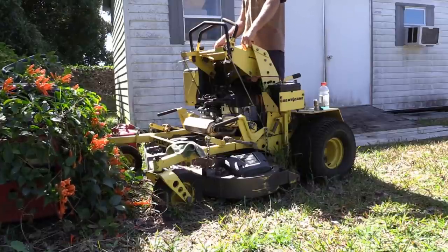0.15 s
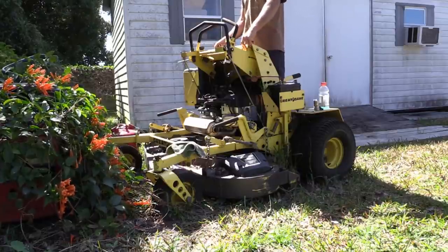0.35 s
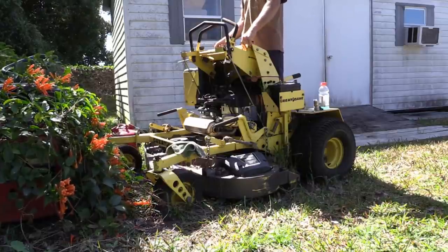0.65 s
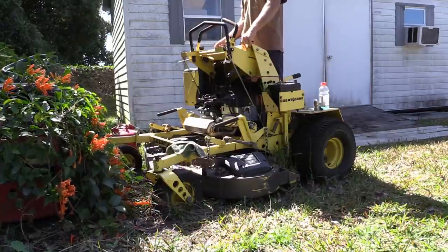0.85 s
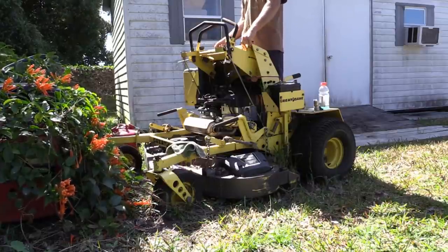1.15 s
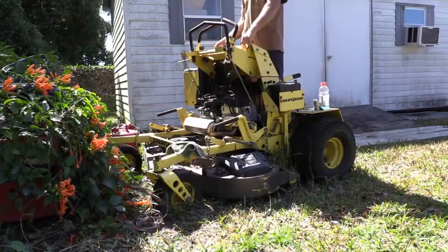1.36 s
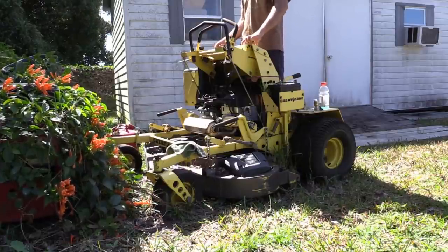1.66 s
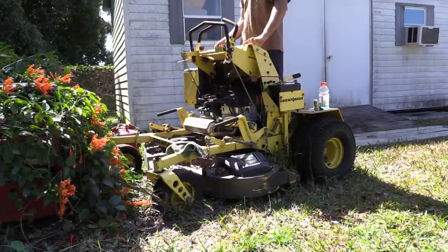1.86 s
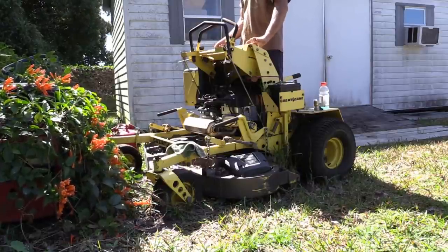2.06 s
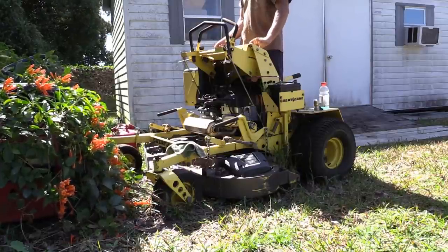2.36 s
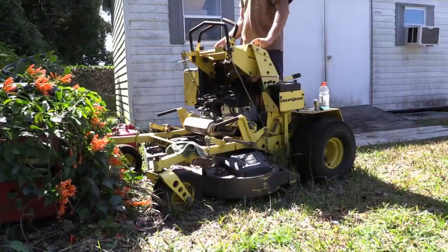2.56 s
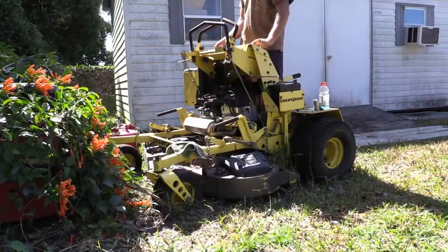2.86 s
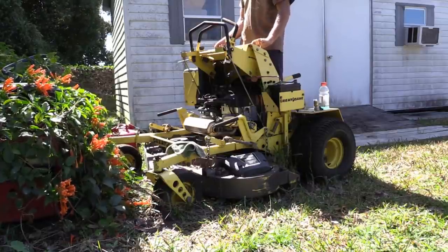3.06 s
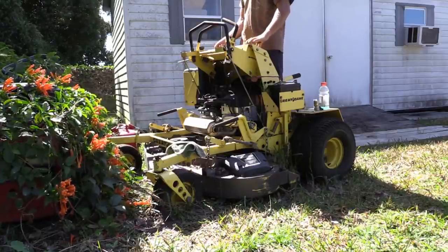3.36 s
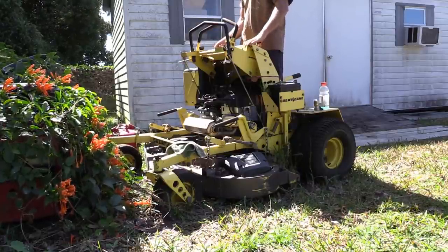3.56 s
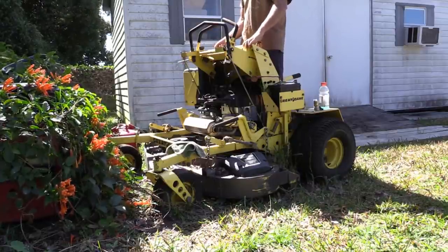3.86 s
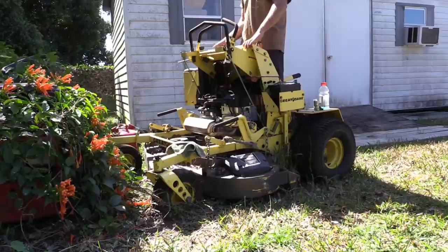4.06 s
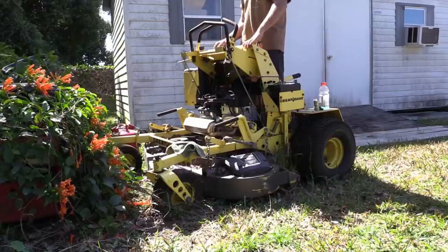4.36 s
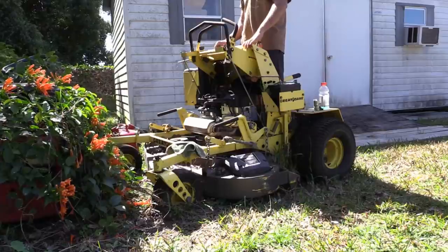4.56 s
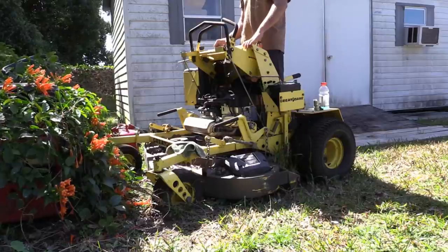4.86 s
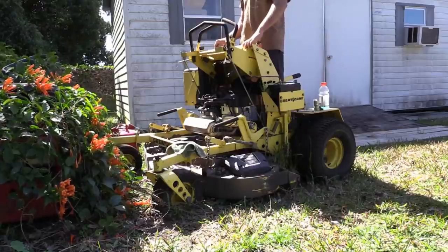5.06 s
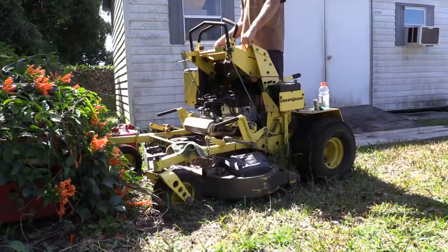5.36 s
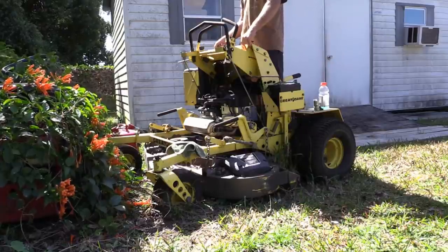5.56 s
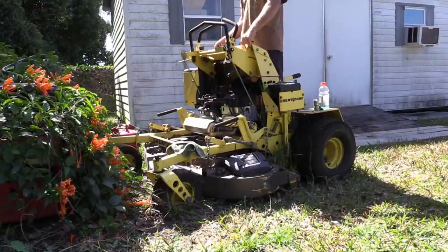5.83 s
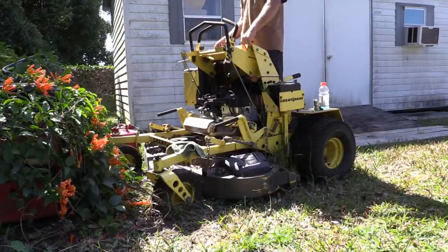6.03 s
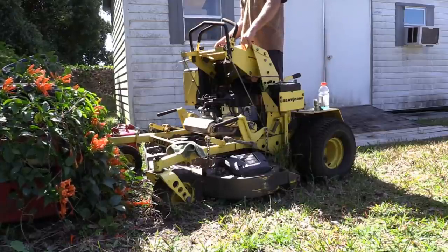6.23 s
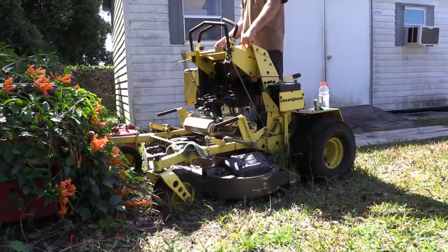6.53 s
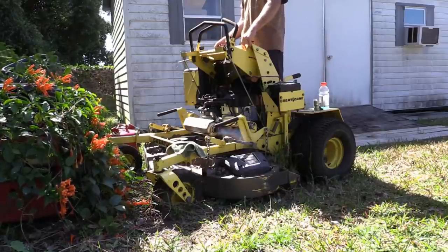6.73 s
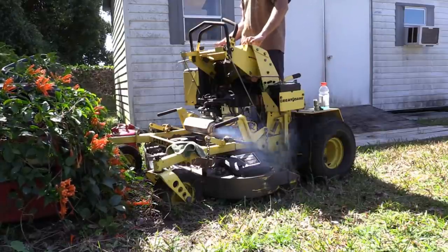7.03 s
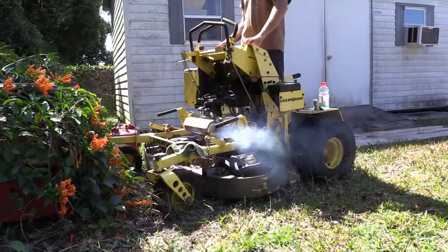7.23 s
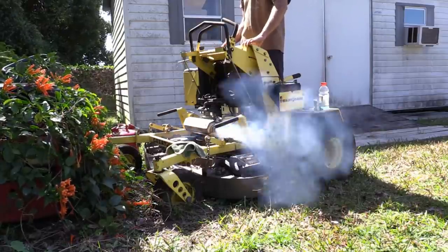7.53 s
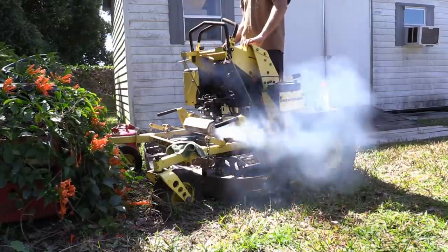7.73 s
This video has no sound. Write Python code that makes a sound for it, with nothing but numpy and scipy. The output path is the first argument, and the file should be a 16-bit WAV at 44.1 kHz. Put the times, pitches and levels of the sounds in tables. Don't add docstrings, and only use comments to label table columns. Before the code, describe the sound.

Quiet outdoor air beside a house wall, mower fairly close. At 0.1 s a solenoid clunk and pinion crunch start the electric starter; its gear whine rushes upward from a low groan within about a second, then holds near 1.3 kHz, gritty and bright, pulsing with every compression, over soft lumpy exhaust puffs. At 3.8 s the starter drops out; the engine freewheels with a dull rumble, scattered valve clacks and cover taps slowing down, ending with a tiny belt squeak at about 4.55 s and faint thumps near 4.8 s. Almost still, then small key clicks at 5.05 and 5.1 s. At 5.3 s the pinion bites again and the whine climbs once more until 6.3 s. The engine fires unevenly, thumping, knocking and faltering, catches around 6.85 s, then accelerates into loud, rapid exhaust beats, sharp block knocks and metallic tappet clatter, still revving at the end, 7.9 s.

```python
import sys
import numpy as np
from scipy import signal
from scipy.fft import rfft, irfft, next_fast_len
from scipy.io import wavfile
from scipy.ndimage import uniform_filter1d

SR = 44100
rng = np.random.default_rng(int(sys.argv[2]) if len(sys.argv) > 2 else 0)


def how_loud(loudness_db):
    steps = np.asarray(loudness_db, float) / 20
    return 10 ** steps


def master_out(mix):
    frames = np.transpose(np.atleast_2d(mix))
    ceiling = np.clip(frames, -1, 1)
    pcm = np.round(ceiling * 32767).astype(np.int16)
    wavfile.write(sys.argv[1], SR, pcm)


N = 347949
TIME = np.arange(N) / SR
PADDED = next_fast_len(N + SR // 2, True)
BINS = np.fft.rfftfreq(PADDED, 1 / SR)

# (frequency [Hz], density [dB/Hz])
YARD_DB_PER_HZ = [(24, -43), (40, -13), (117, 0.5), (301, -7.5), (417, -5), (606, -4), (998, -1),
                  (1680, -4.5), (3840, -10), (9650, -22), (10700, -26), (11800, -28), (15500, -27)]
YARD_DB = -46
# (frequency [Hz], left minus right [dB])
LEFT_MINUS_RIGHT_DB = [(60, 0.5), (150, -1), (380, 0), (950, 3), (2380, 2.0), (5980, 2), (15000, 2)]
# (frequency [Hz], level [dB])
WALL_DB = [(30, -10), (100, -29.5), (300, -17.5), (1000, -13.5), (2000, -15.5), (4500, -7.5), (9000, -12),
           (13000, -11)]

# (time [s], rate [four-stroke cycles/s])
REVS_HZ = [
    (6.856, 6.44),
    (7.172, 8.05),
    (7.668, 12.33),
    (8.1, 12.8),
]
# (multiple of cycle rate, level [dB])
DRONE_ORDERS = [(10, -27), (14, -30), (16, -27)]
# (place [0-1], level [dB], pitch [Hz])
PULSES = [
    (0, -1, 165),
    (.19, 1, 180),
    (.5, 0, 170),
    (.69, -8, 170),
    (.81, -10, 170),
]
# (time [s], peak [dB], pitch [Hz])
THUMPS = [(4.775, -40, 137), (4.784, -33, 196), (4.809, -37, 151), (4.829, -42, 205), (6.326, -27, 103),
          (6.339, -24, 285), (6.384, -20, 188), (6.459, -24, 285), (6.593, -24, 156), (6.608, -16, 291),
          (6.634, -22, 116), (6.653, -18, 194), (6.709, -22, 296), (6.792, -24, 293), (6.816, -12, 275),
          (6.832, -11, 290), (6.866, -13, 207), (6.886, -19, 280), (6.912, -16, 221), (6.941, -9, 318),
          (6.956, -17, 248)]
# (time [s], level [dB])
PUFFING_DB = [
    [(0.1, -41), (0.21, -45.5), (1.3, -38), (2.6, -35.5), (3.69, -28), (3.96, -39.5), (4.33, -34.5),
     (4.5, -58), (4.9, -53)],
    [(5.3, -52), (5.48, -61), (6.29, -41), (6.33, -35.5), (6.75, -38), (6.85, -27), (7.3, -23), (7.89, -42)],
]
# (frequency [Hz], density [dB/Hz])
PIPE_DB_PER_HZ = [(18, -50), (30, -23), (65, -4.5), (172, 5), (223, -7), (257, -0.5), (316, -19),
                  (350, -8.5), (460, 3.5), (770, -120)]
# (time [s], pitch [Hz], partial 1 [dB], partial 3 [dB], partial 4 [dB])
SQUEAK = [
    (4.535, 423, -43, -64, -62),
    (4.55, 463, -40, -35, -44),
    (4.565, 486, -32.5, -34, -39),
    (4.61, 495, -39.5, -61, -58),
    (4.645, 504, -51, -80, -79),
]

# (frequency [Hz], density [dB/Hz])
BLOCK_DB_PER_HZ = [(120, -29), (200, -15), (244, -3.5), (462, -8), (690, -7), (906, -4.5), (1030, -5.5),
                   (1170, -1), (1910, -5), (3300, -6), (7900, -16.5), (12000, -26.5), (15500, -39)]
# (frequency [Hz], width [Hz], level [dB])
BLOCK_MODES = [(436, 87, -4), (570, 76, 0), (769, 38, 4.5), (890, 99, 0.5), (1210, 59, -41),
               (2660, 180, -1), (3400, 160, -7), (4780, 100, -5)]
# (time [s], level [dB])
EFFORT_DB = [
    (6.28, -19),
    (6.36, -15),
    (6.49, -19),
    (6.68, -15.5),
    (7.03, -13.5),
    (7.5, -13),
    (7.89, -12),
]
# (time [s], change [dB], half width [s])
CHUFFS = [(6.36, 0.5, .03), (6.41, 1, 0.017), (6.56, 1.5, 0.018), (6.645, 0.5, 0.031), (6.78, -4, .015),
          (6.88, 2.5, .03), (6.935, 2, 0.0068), (6.975, 2, 0.012), (7.025, 3.5, 0.015), (7.06, 2.5, 0.044),
          (7.155, 4, 0.036), (7.235, 3, 0.025), (7.27, 3.5, 0.016), (7.355, 4, 0.041), (7.45, 2, 0.015),
          (7.49, 1.5, 0.0081), (7.54, -1.5, 0.013), (7.575, 2.5, 0.013), (7.625, 0.5, 0.012),
          (7.70, 0.5, 0.022), (7.79, 2, 0.014), (7.865, -1, 0.017)]
# (time [s], peak [dB])
CLACKS_COASTING = [(3.8783, -16), (3.908, -26), (3.977, -30), (4.006, -31), (4.018, -22.5), (4.073, -28),
                   (4.101, -29), (4.116, -23), (4.134, -30), (4.1799, -33), (4.2135, -35), (4.2634, -41),
                   (4.28, -43), (4.315, -37), (4.346, -29), (4.3984, -48), (4.4445, -39), (4.4836, -39),
                   (4.58, -36.5), (4.9791, -42)]
# (time [s], peak [dB], ring [Hz])
CLACKS_RUNNING = [(6.3523, -11.5, 2840), (6.374, -11.5, 2710), (6.4144, -15, 2470), (6.461, -21, 3190),
                  (6.5299, -30, 2060), (6.553, -19, 2430), (6.601, -14.5, 2640), (6.6283, -16, 2890),
                  (6.638, -14, 2900), (6.649, -15, 2870), (6.674, -15.5, 3330), (6.7124, -24, 2610),
                  (6.79, -16, 2830), (6.859, -10, 2700), (6.917, -8.5, 3020), (6.944, -8.5, 4900),
                  (6.995, -8, 3180), (7.132, -15, 2820), (7.1547, -13, 3400), (7.253, -11, 3270),
                  (7.3626, -11, 2290), (7.4145, -11, 3400), (7.4636, -9, 3220), (7.5067, -11, 3180),
                  (7.554, -16, 2710), (7.6383, -9, 3530), (7.655, -12, 3740), (7.76, -11, 7250),
                  (7.798, -13, 2660), (7.837, -16, 3320)]
# (time [s], peak [dB], ring [Hz])
COVER_TAPS = [(3.879, -24, 1230), (3.899, -14, 1115), (3.977, -15, 1230), (3.999, -14, 764),
              (4.009, -23, 1200), (4.067, -32, 890), (4.109, -23, 900), (4.155, -24, 725),
              (4.177, -24, 1160), (4.265, -20, 1210), (4.289, -27, 790), (4.317, -20, 1230),
              (4.379, -39, 910), (4.407, -38, 810), (4.448, -28, 1150), (4.482, -34, 1160)]
# (time [s], peak [dB], ring [Hz], T60 [s])
CHINKS = [
    (4.02, -27, 3600, .05),
    (4.1152, -28, 3910, .06),
    (4.18, -33, 2100, .04),
    (4.3472, -30, 3620, .05),
    (4.444, -37, 2290, .04),
]
# (time [s], peak [dB])
TAPPET_TICKS = [(6.3185, -7), (6.3515, -15), (6.3749, -10), (6.4143, -13), (6.462, -8.5), (6.5121, -24),
                (6.5294, -23), (6.553, -20), (6.5939, -14), (6.6014, -18), (6.6244, -14), (6.6408, -18),
                (6.6717, -16), (6.7124, -21), (6.788, -8), (6.8573, -4), (6.9164, -13), (6.9464, -11),
                (6.995, -2.5), (7.0768, -23), (7.132, -0.5), (7.1556, -13), (7.2035, -19), (7.2529, -4),
                (7.2754, -9), (7.3622, -5), (7.3814, -6), (7.4135, -12), (7.4624, -13), (7.4794, -3),
                (7.5078, -4), (7.5522, -6), (7.5694, -8), (7.5951, -5), (7.6524, -8), (7.7174, -7),
                (7.7348, -5), (7.7598, -6), (7.7997, -13), (7.815, -4), (7.8386, -5), (7.86, -17),
                (7.8794, -8)]
# (time [s], peak [dB], ring [Hz], T60 [s])
KEY_CLICKS = [
    (5.0464, -34.5, 1590, 0.13),
    (5.0485, -39, 810, 0.15),
    (5.1013, -40.5, 2920, 0.21),
]
# (time [s], peak [dB], ring [Hz])
KNOCKS = [(6.331, -8, 920), (6.401, -4.5, 777), (6.659, -12, 776), (6.723, -18, 880), (6.777, -6, 770),
          (6.843, -7, 890), (6.879, -3, 884), (6.938, -22, 950), (7.05, -7, 890), (7.104, 2, 903),
          (7.15, -7, 930), (7.187, -6, 910), (7.242, -6, 850)]
# (time [s], peak [dB])
BLOWS = [
    (7.353, -5),
    (7.445, -4),
    (7.538, -1.5),
    (7.624, -3.5),
    (7.705, -11),
    (7.786, -8),
    (7.865, -4),
]

# (spin-up clock start [s], speed share, place in engine cycle [0-1])
CRANKS = [
    (.17, 1, .08),
    (5.381, .993, .21),
]
# (time [s], grind above 2.2 kHz [dB], grind below [dB])
LET_GO = [
    (3.8, -17.5, -25),
    (6.292, -16, -27.5),
]
COMPRESSIONS = [0.97, 0.3425]
TEETH_PER_CYCLE, TEETH_ON_PINION = 230.5, 15
TOP_HZ, RUSH_HZ, RUSH_S, CREEP_HZ, CREEP_S = 1308.3, 723.8, .2519, 329.7, .67
HEAVE_HZ, HEAVE_HZ_PER_S, DRAG_HZ, DRAG_S = 245, 1500, 65, .09
COAST_S, COAST_DB, HISS_DB, HISS_DB_PER_S = 0.9, -21, -29, -31
# (frequency [Hz], width [Hz], level [dB])
HOUSING_MODES = [(425, 50, 4), (915, 110, 5.5), (1170, 60, 7), (2120, 40, -2), (2730, 60, 8),
                 (2830, 90, 11), (3870, 200, -3), (4870, 90, 5), (4600, 200, 0), (5190, 140, 6),
                 (6340, 90, 0), (6780, 200, 5), (7390, 120, 0), (8110, 120, 5), (8640, 180, 5),
                 (9740, 70, 3), (10500, 200, 2)]
# (time [s], peak [dB], length [s])
BITES = [
    (0.095, -20, 0.013),
    (0.11, -11.5, 0.028),
    (0.12, -14.5, 0.015),
    (5.298, -23, 0.013),
    (5.314, -17, 0.033),
    (5.323, -14.5, 0.012),
]
# (frequency [Hz], density [dB/Hz])
BITE_DB_PER_HZ = [(120, -50), (200, -12), (399, -5.5), (715, -1), (1070, -10), (1170, -1.5), (1780, 3.5),
                  (2850, -7), (3180, -3.5), (8350, -6), (15500, -31)]
# (frequency [Hz], density [dB/Hz])
GRIND_DB_PER_HZ = [(120, -50), (200, -14.5), (1050, -8.5), (1280, -5), (1810, -8.5), (2700, -3),
                   (3240, -7.5), (5200, -7), (5590, -7.5), (8350, -9), (10800, -17.5), (13900, -26),
                   (15500, -49)]
IDLE_GRIND_SHARE = .2
# (mesh rate [Hz], level [dB])
WHINE_DB = [(200, -40.5), (300, -25), (430, -19.5), (560, -24), (826, -20), (945, -6), (1085, -22.5),
            (1140, -15.5), (1175, -12.5), (1210, -15), (1245, -27), (1290, -27.5), (1310, -24.5)]
# (first crank [dB], second crank [dB])
OVERTONES_DB = [(-13, -14), (-17, -12), (-14, -9), (-22, -20), (-27, -26)]
# (time [s], change [dB], half width [s])
SLIPS = [(.17, -8, .015), (.224, -10, 0.0049), (5.405, -12, 0.0098), (5.438, -15, 0.0071),
         (5.46, -0.5, 0.0093), (5.512, -7, 0.0087), (5.552, -10, 0.02), (.3, -23, 0.0063),
         (.44, -6, 0.0059), (.565, -6, 0.037), (.36, -2, 0.026), (1.225, 6, 0.022), (.59, -18, 0.0059),
         (0.659, -11, 0.016), (0.851, -12, 0.015), (1.071, -17, 0.0067), (1.114, -18, 0.0071),
         (1.18, -19, 0.012), (1.26, 7, 0.012), (5.665, -18, 0.0091), (5.77, -11.5, 0.058),
         (5.85, -30, 0.0099), (5.914, -20, 0.016), (5.975, -9, 0.0093), (6.115, -18, 0.0065),
         (6.205, -14, 0.0069), (6.256, -21, 0.0078)]
# (time [s], share of speed, half width [s])
SURGES = [
    (.275, 0.044, 0.042),
    (5.49, .02, 0.029),
    (5.75, -0.036, 0.0256),
]
# (time [s], change [dB], half width [s])
FLARES = [
    [(.23, -8, 0.032), (.285, 3.5, 0.0097), (.39, -1, .02), (.43, 7, .015), (.52, 1, .04), (.65, 5, .03),
     (.88, 3, .08), (1.3, 2, .15), (6.15, 8, 0.087), (5.45, -6, .02), (5.52, 1.5, .025), (5.64, -2, .04),
     (5.97, 14, .02)],
    [(.275, 20, .03), (.335, 15, 0.028), (.5, 11, .05), (1.2, 4, .2), (5.97, 3, .04), (5.5, 15, .03),
     (5.565, 10, .03), (5.62, 7, .02), (5.71, 2, 0.028), (6.15, 12, 0.048)],
    [(.275, 14, .025), (.56, -4, 0.072), (.86, 8, .1), (1.3, 3, 0.13), (6.0, 7, 0.055), (5.49, 5, .02),
     (5.55, 4, .025), (5.7, -11, 0.13), (6.2, 2, .1)],
    [(.28, 15.5, 0.037), (.6, 14, .04), (5.47, 19, 0.038), (5.7, 1, .03)],
    [(.29, 20, 0.034), (5.45, 17, .03), (5.68, 6, .03)],
]


def evened(x):
    return x / np.sqrt(np.mean(x ** 2) + 1e-20)


def read(points, hz=BINS):
    f_hz, value = np.transpose(points)
    return np.interp(np.log(hz + 1), np.log(f_hz + 1), value)


def ringing(modes):
    return 1 + sum(how_loud(db) / (1 + 2j * (BINS - hz) / width_hz) for hz, width_hz, db in modes)


def coloured(x, gain):
    return irfft(rfft(x, PADDED) * gain, PADDED)[:N]


def above(hz):
    return 1 / (1 + (hz / (BINS + 1)) ** 6)


def level(tables, column):
    gain = np.zeros(N)
    for rows in tables:
        time_s, db = np.transpose(rows)[[0, column]]
        edge_s = np.minimum(TIME - time_s[0], time_s[-1] + 0.0083 - TIME)
        gain += how_loud(np.interp(TIME, time_s, db)) * np.clip(edge_s / 0.0057, 0, 1)
    return gain


def humps(rows):
    return sum(size * np.exp(-((TIME - s) / half_s) ** 2) for s, size, half_s in rows)


def bump(cycle, place, width):
    return np.exp((np.cos(2 * np.pi * (cycle - place)) - 1) / (2 * np.pi * width) ** 2)


def compressions(cycle, lag, width):
    return sum(bump(cycle, place + lag, width) for place in COMPRESSIONS)


def rattle(depth_db, grain_s):
    grain = max(int(grain_s * SR), 2)
    flicker = evened(uniform_filter1d(rng.standard_normal(N), grain))
    return evened(rng.standard_normal(N) * how_loud(depth_db * flicker))


def wander(count, size):
    steps = rng.standard_normal((count, N))
    return evened(uniform_filter1d(uniform_filter1d(steps, size, 1), size, 1))


def add(mix, s, sound):
    at = round(s * SR)
    part = mix[at:at + len(sound)]
    part += sound[:len(part)]


def each(column):
    return np.where(TIME < 5, *column)


def held(early_s, late_s, fall_db_per_s):
    on_s = TIME - each(np.transpose(CRANKS)[0]) + early_s
    off_s = TIME - each(np.transpose(LET_GO)[0]) - late_s
    fall = how_loud(fall_db_per_s * np.maximum(off_s, 0)) * np.clip((.09 - off_s) / 0.013, 0, 1)
    return np.clip(on_s / 0.0034, 0, 1) * fall


def crank():
    start_s, share, place = np.transpose(CRANKS)
    u = TIME - each(start_s)
    spin_hz = TOP_HZ - RUSH_HZ * np.exp(-u / RUSH_S) - CREEP_HZ * np.exp(-u / CREEP_S)
    spin_hz = spin_hz - DRAG_HZ * np.exp(-(u / DRAG_S) ** 2)
    heave_hz = HEAVE_HZ + HEAVE_HZ_PER_S * np.clip(u, -.08, .04)
    mesh_hz = np.maximum(each(share) * spin_hz, heave_hz)
    cycle = np.cumsum(mesh_hz) / SR / TEETH_PER_CYCLE
    return mesh_hz, cycle + each(place - np.interp(start_s, TIME, cycle))


def running_cycles():
    t = np.arange(REVS_HZ[0][0], REVS_HZ[-1][0], 1 / SR)
    turns = np.cumsum(np.interp(t, *np.transpose(REVS_HZ))) / SR
    start_s = np.interp(np.arange(1, int(turns[-1]) + 1), turns, t)
    return [(a, b - a) for a, b in zip(start_s, start_s[1:]) if a < N / SR]


def yard():
    same, left, right = (coloured(rattle(1.0, 0.041), how_loud(read(YARD_DB_PER_HZ))) for _ in range(3))
    return how_loud(YARD_DB) * evened(same + 0.83 * np.array([left, right]))


def squeak():
    time_s, hz = np.transpose(SQUEAK)[:2]
    turns = np.cumsum(np.interp(TIME, time_s, hz)) / SR
    return sum(np.sqrt(2) * level([SQUEAK], column) * np.sin(2 * np.pi * partial * turns)
               for column, partial in [(2, 1), (3, 3), (4, 4)])


def drone():
    rate_hz = np.interp(TIME, *np.transpose(REVS_HZ)) * (TIME >= REVS_HZ[0][0])
    turns = np.cumsum(rate_hz) / SR
    tones = sum(how_loud(db) * np.cos(2 * np.pi * k * turns) for k, db in DRONE_ORDERS)
    return how_loud(-5.0) * np.clip((TIME - 7.2) / 0.5, 0, 1) * tones


def exhaust():
    firings = []
    for s, length_s in running_cycles():
        speed_db = -9.5 + 25.0 * np.log10(0.077 / length_s)
        for place, db, hz in PULSES:
            firings.append((s + place * length_s, speed_db + db, hz * (0.083 / length_s) ** 0.2))
    firings = np.array(firings)
    firings = firings + rng.standard_normal((len(firings), 3)) * [.0002, .8, 3]
    t, pulses = np.arange(-400, 800) / SR, np.zeros(N + SR)
    for s, db, hz in THUMPS + list(firings):
        swell = np.exp(-((t - .002) * hz / 0.66) ** 2)
        add(pulses, s + t[0], how_loud(db) * swell * np.cos(2 * np.pi * hz * t))
    puffs = how_loud(9.3 * compressions(crank()[1], 0.021, 0.023) * (TIME < 6.3))
    air = evened(coloured(rng.standard_normal(N) * puffs, how_loud(read(PIPE_DB_PER_HZ))))
    return coloured(pulses[:N], above(63)) + air * level(PUFFING_DB, column=1)


def block():
    colour = how_loud(read(BLOCK_DB_PER_HZ)) * ringing(BLOCK_MODES)
    low = evened(coloured(rattle(2.2, .005), colour * (1 - above(2400))))
    high = evened(coloured(rattle(1.6, 0.0055), colour * above(2420)))
    cover_modes = [(427, 38, 4), (880, 110, -9), (1230, 77, -25)]
    dull = evened(coloured(low, (1 - 0.18 * above(1700)) * ringing(cover_modes)))
    u = TIME - LET_GO[0][0]
    coasting = np.clip(u / 0.0053, 0, 1) * (u < COAST_S)
    speed = np.clip(1 - u / COAST_S, 0, 1)
    effort = level([EFFORT_DB], column=1)
    chuffs = how_loud(humps(CHUFFS) - 2.5)
    rumble = dull * coasting * how_loud(COAST_DB) * speed ** 1.59 + low * effort * chuffs
    coast_hiss = coasting * how_loud(HISS_DB + HISS_DB_PER_S * u)
    firing_hiss = how_loud(9.0) * effort ** 1.723 * chuffs ** 0.91
    return rumble * how_loud(-0.5) + high * (coast_hiss + firing_hiss) * how_loud(-3.5)


def clacks(rows, dullness, ring_db, rise_s=0.00069, burst_db=-1.5, top_hz=14000):
    t, burst, rings = np.arange(5000) / SR, np.zeros(N), np.zeros(N)
    for s, db, hz, t60_s in rows:
        shape = how_loud(db - 60 * t / t60_s) * (1 - np.exp(-t / rise_s))
        add(burst, s, shape)
        add(rings, s, shape * np.sin(2 * np.pi * hz * t))
    colour = how_loud(read(BLOCK_DB_PER_HZ) * dullness) * above(550) * (1 - above(top_hz))
    noise = evened(coloured(rng.standard_normal(N), colour))
    return how_loud(burst_db) * burst * noise + how_loud(ring_db) * rings


def coasting_clatter():
    valves = clacks([(*row, 1230, .055) for row in CLACKS_COASTING], 1.0, -17)
    chinks = clacks(CHINKS, 1.0, 0.0, burst_db=-12)
    taps = clacks([(*row, .06) for row in COVER_TAPS], 1.0, .1, 0.002, -13)
    covers = sum(clacks([(s, db, hz, .09) for s, db in CLACKS_COASTING], 0.88, ring_db)
                 for hz, ring_db in [(430, 3), (880, 3.3)])
    return valves + chinks + taps + how_loud(-9.0) * covers


def running_clatter():
    tappets = clacks([(*row, 7000, .035) for row in TAPPET_TICKS], 0.12, -18, burst_db=-3.5, top_hz=9500)
    valves = clacks([(*row, .06) for row in CLACKS_RUNNING], 0.48, -3.0)
    return tappets + valves


def key():
    return clacks(KEY_CLICKS, 0.87, 1.8)


def knocks():
    t, out = np.arange(2000) / SR, np.zeros(N)
    for s, db, hz in KNOCKS:
        shape = how_loud(db - 60 * t / 0.045) * (1 - np.exp(-t / 0.0019))
        add(out, s, shape * np.sin(2 * np.pi * hz * t))
    sharp = how_loud(4 - 60 * t / 0.024) * (1 - np.exp(-t / 0.00075))
    blow = sharp * (np.sin(2 * np.pi * 870 * t) + 0.75 * np.sin(2 * np.pi * 680 * t))
    for s, db in BLOWS:
        add(out, s, how_loud(db) * blow)
    return out * how_loud(-0.5)


def bites():
    colour = how_loud(read(BITE_DB_PER_HZ)) * ringing(HOUSING_MODES[:8])
    crunch = evened(coloured(rattle(2.7, 0.00082), colour))
    strength = np.zeros(N)
    for s, db, length_s in BITES:
        u = np.arange(0, 4, 1 / (length_s * SR))
        add(strength, s, how_loud(db) * (1 - np.exp(-u * length_s / 0.0014)) * np.exp(-u ** 2 * 0.78))
    return strength * crunch


def grind():
    mesh_hz, cycle = crank()
    speed = mesh_hz / TOP_HZ
    squeeze = compressions(cycle, 0.075, 0.086)
    ticks = how_loud(each([4, 2.5]) * bump(4 * cycle, .4, .12))
    colour = how_loud(read(GRIND_DB_PER_HZ)) * ringing(HOUSING_MODES)
    high = evened(coloured(rattle(1.1, 0.0049) * ticks, colour * above(2190)))
    low = evened(coloured(rattle(0.93, 0.0039) * how_loud(1.5 * squeeze), colour * (1 - above(2220))))
    strokes = rng.standard_normal(N) * bump(4 * cycle, .52, .14)
    buzz = evened(coloured(strokes, ringing([(5190, 150, 0)]) - 1))
    heave = np.exp(-((TIME - each(np.transpose(CRANKS)[0])) / 0.13) ** 2)
    labour = how_loud(each([1.5, 4]) * heave)
    thinning = np.clip(each([1.2, 2.5]) * (1 - speed), 0, .9)
    low = low * labour - coloured(low, 1 - above(270)) * thinning
    groan_modes = [(890, 32, 1.9), (1140, 28, 3.6), (1640, 97, 2)]
    low += (labour - 1) * coloured(low, ringing(groan_modes) - 1)
    high = high - coloured(high, above(6900)) * (1 - speed ** 1.08)
    high = high - coloured(high, 1 - above(2300)) * 0.91 * (1 - speed ** 3.1)
    _, high_db, low_db = np.transpose(LET_GO)
    bright = how_loud(each(high_db) + 0.98) * (speed ** each([1.9, 2.6]) + IDLE_GRIND_SHARE)
    bright = bright * held(0.015, .0, -220)
    dull = how_loud(each(low_db) + 6) * speed ** 0.3 * held(0.0435, .0, -300)
    return (high + 0.067 * buzz) * bright + low * dull


def whine():
    even_hz, cycle = crank()
    speed = even_hz / TOP_HZ
    lurch = np.clip((.99 - speed) / .06, 0, 1)
    sag = (.012 + .019 * lurch) * compressions(cycle, 0.018, .045)
    mesh_hz = even_hz * (1.001 + .006 * lurch - sag) * (1 + humps(SURGES))
    drift = wander(count=7, size=500)
    teeth = np.cumsum(mesh_hz * (1 + (0.0018 + 0.00525 * lurch) * drift[0])) / SR

    load = how_loud(2.7 * compressions(cycle, -.02, 0.071))
    runout = 1 + 0.25 * np.cos(2 * np.pi * teeth / TEETH_ON_PINION)
    contact = np.clip(1 + (.18 + .1 * lurch) * drift[1], .05, 1.5)
    first = evened(np.cos(2 * np.pi * teeth) * runout * load * contact)

    smear = .33 + .2 * lurch
    lag = 1 - speed
    upper = np.zeros(N)
    for k, db, d, flares in zip(range(2, 7), OVERTONES_DB, drift[2:], FLARES):
        lag_db = 14 * lag ** 2 if k == 2 else -22 * lag
        strength = how_loud(each(db) + humps(flares) + 3.5 * d + lag_db)
        upper += strength * np.cos(2 * np.pi * k * teeth + k * smear * d)

    on = held(0.045, 0.013, -600)
    effort = how_loud(-11.5 - 11.0 * speed ** 2) * on * np.clip(speed / 0.36, 0, 1) ** 2.0 * how_loud(each([1.5, -1.5]))
    gain = on * how_loud(read(WHINE_DB, mesh_hz) + humps(SLIPS))
    strokes_db = 3 * bump(2 * cycle, .76, .13) + 10 * bump(4 * cycle, .52, .12) - 5
    beads = how_loud(speed ** 2 * strokes_db)
    return first * gain + coloured(upper * beads * effort, ringing(HOUSING_MODES))


def scene():
    starter = whine() + grind() + bites() + key()
    clatter = coasting_clatter() + running_clatter()
    engine = block() + clatter + knocks() + exhaust() + drone()
    mower = starter + engine + squeak()
    echoes = rng.standard_normal(N) * how_loud(-60 * np.minimum(TIME, 1) / 0.11) * (TIME > .002)
    scatter = rfft(echoes / np.linalg.norm(echoes), PADDED) * how_loud(read(WALL_DB))
    lean = how_loud(read(LEFT_MINUS_RIGHT_DB) / 2)
    left = coloured(mower, lean * (1 + scatter))
    right = coloured(mower, (1 - scatter) / lean)
    return np.array([left, right]) + yard()


def low_pass(x):
    return signal.sosfilt(signal.butter(12, 15690, fs=SR, output="sos"), x)


def record(dry):
    mix = 1.49 * np.tanh(dry / 1.639)
    return low_pass(mix)


dry = scene()
out = record(dry)
master_out(out)
```